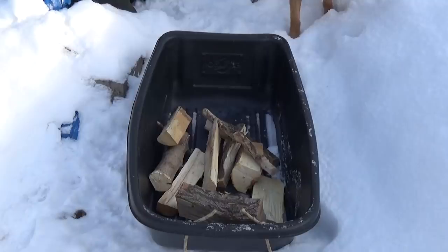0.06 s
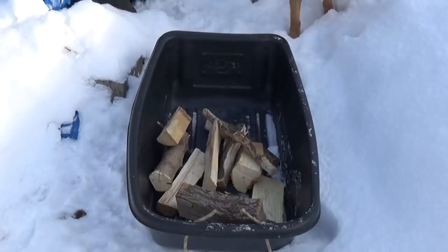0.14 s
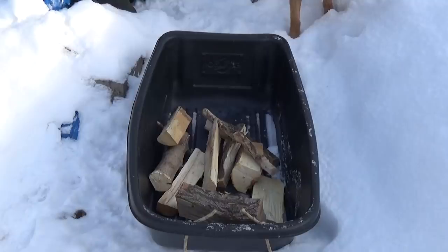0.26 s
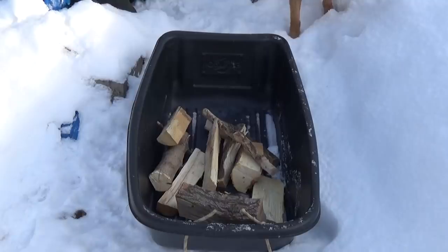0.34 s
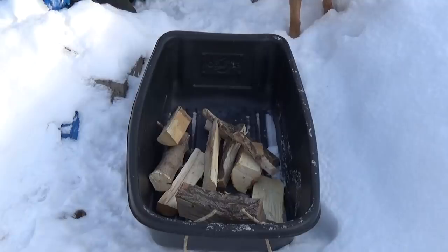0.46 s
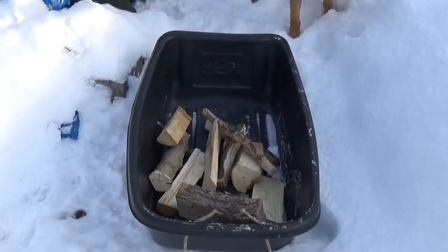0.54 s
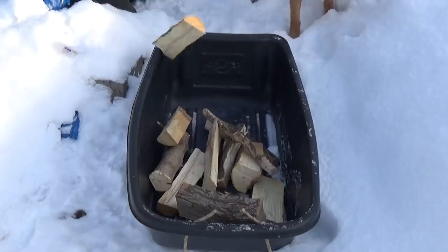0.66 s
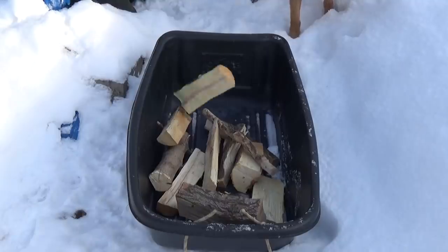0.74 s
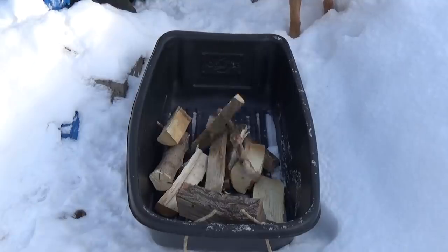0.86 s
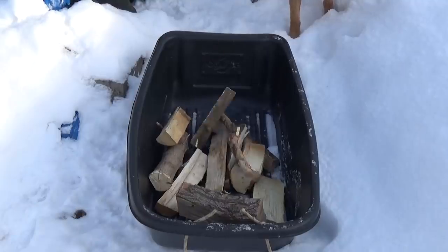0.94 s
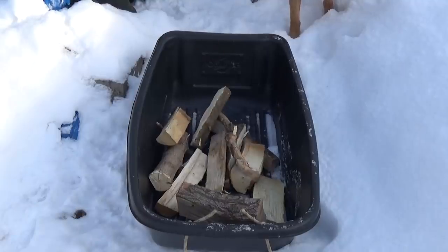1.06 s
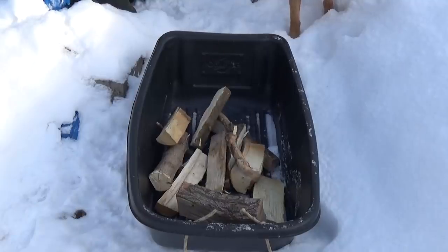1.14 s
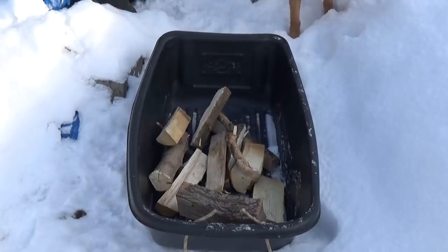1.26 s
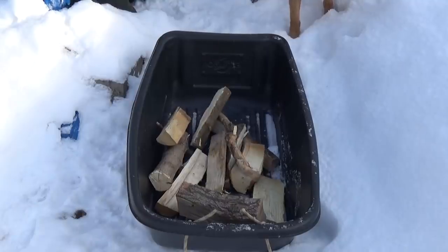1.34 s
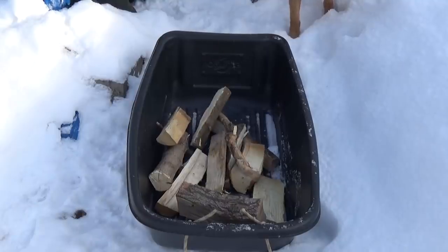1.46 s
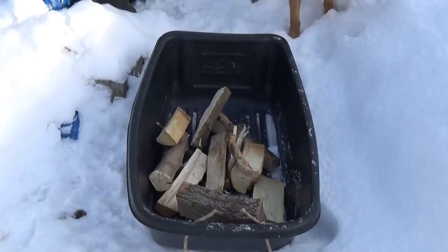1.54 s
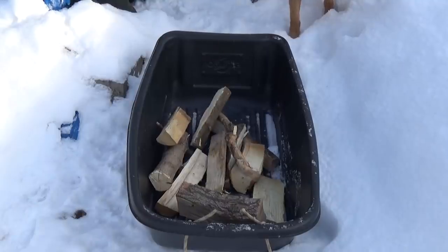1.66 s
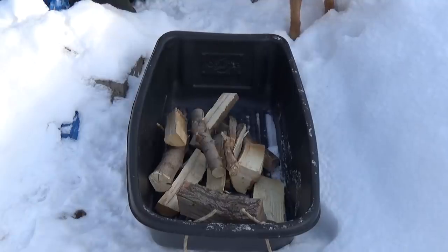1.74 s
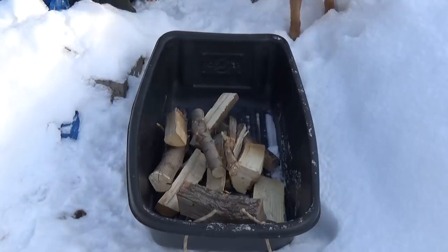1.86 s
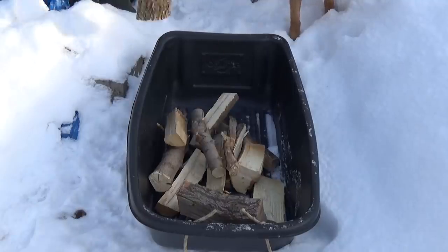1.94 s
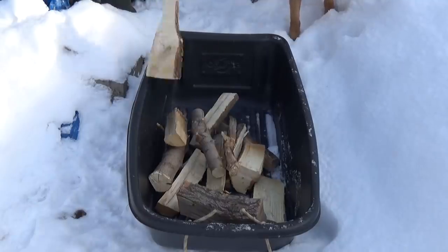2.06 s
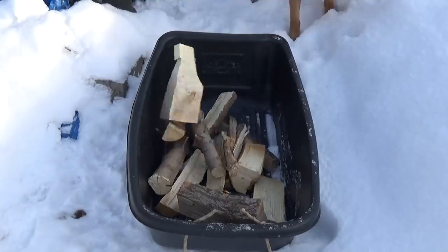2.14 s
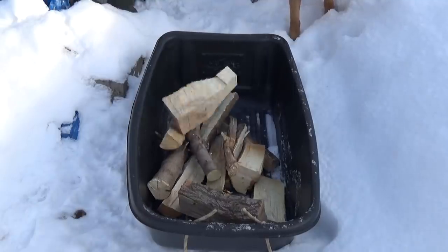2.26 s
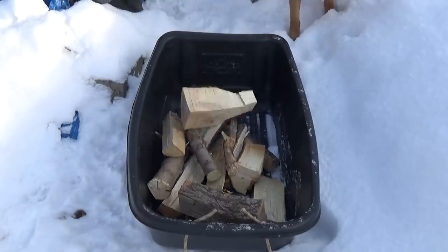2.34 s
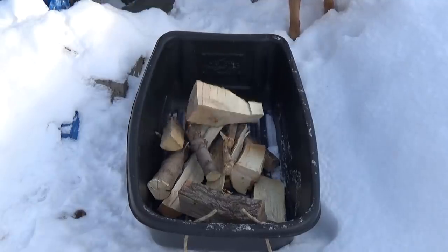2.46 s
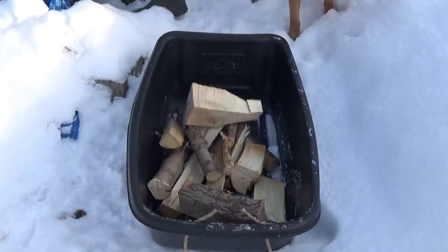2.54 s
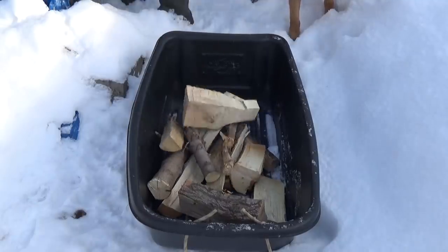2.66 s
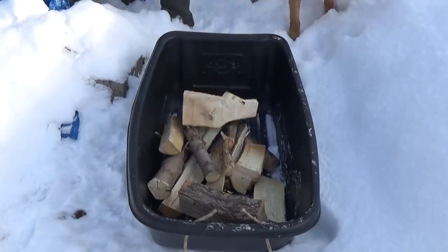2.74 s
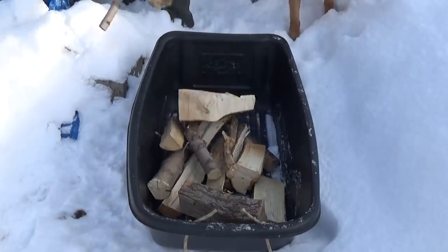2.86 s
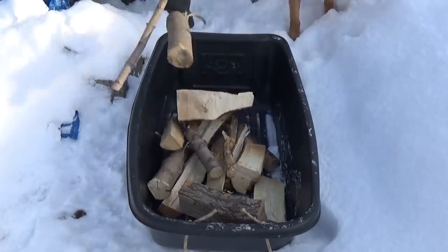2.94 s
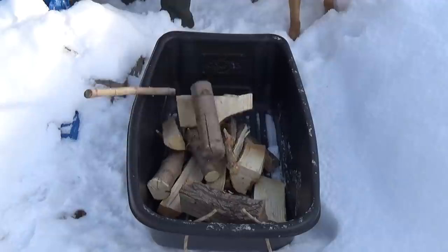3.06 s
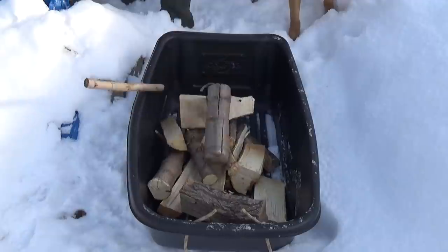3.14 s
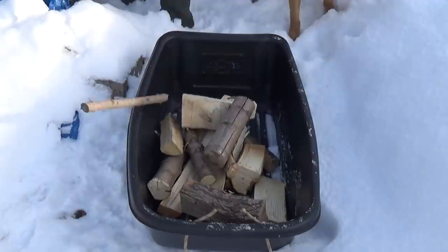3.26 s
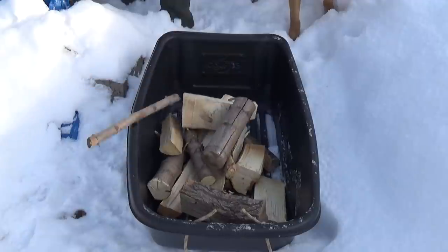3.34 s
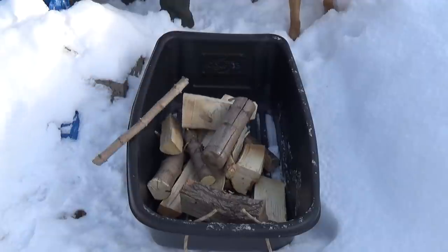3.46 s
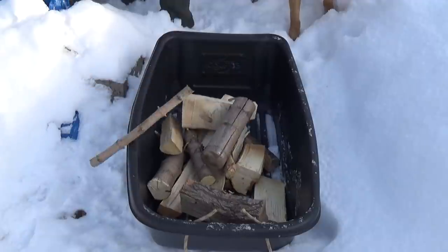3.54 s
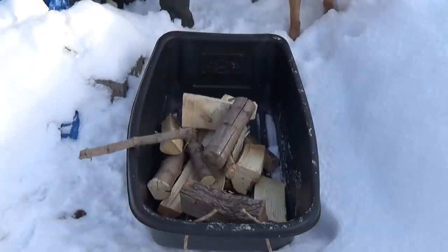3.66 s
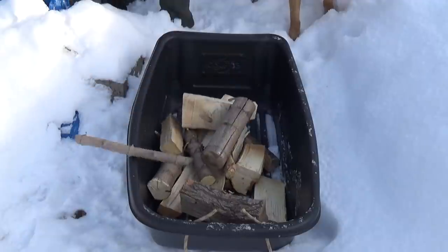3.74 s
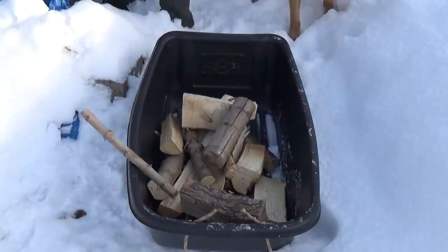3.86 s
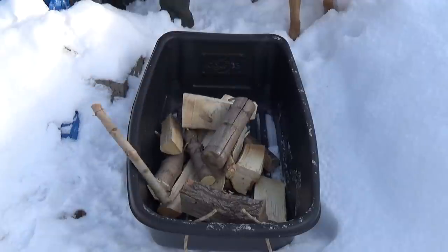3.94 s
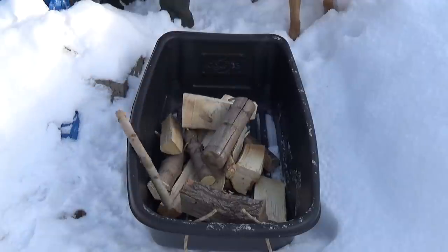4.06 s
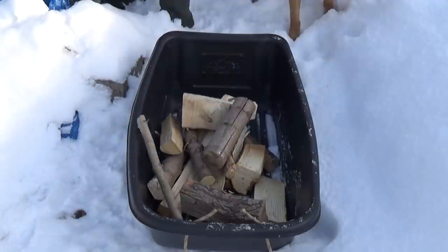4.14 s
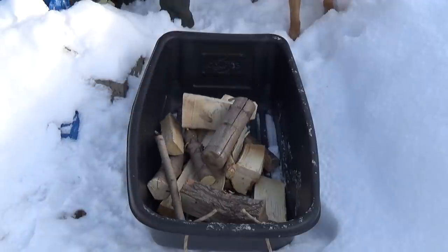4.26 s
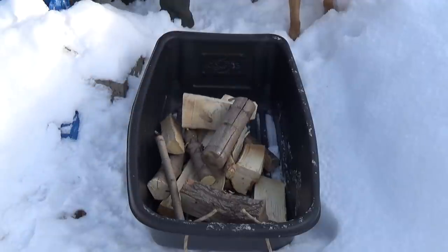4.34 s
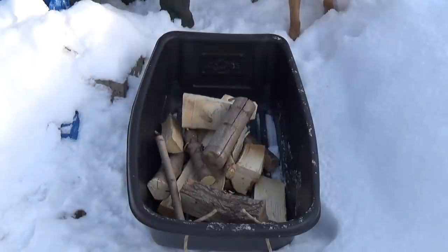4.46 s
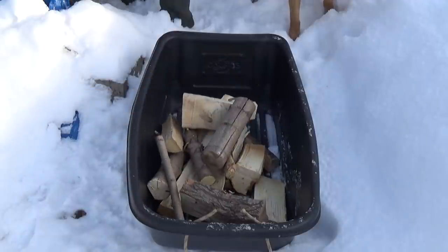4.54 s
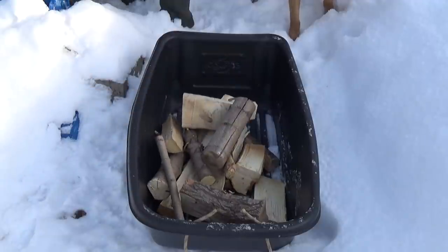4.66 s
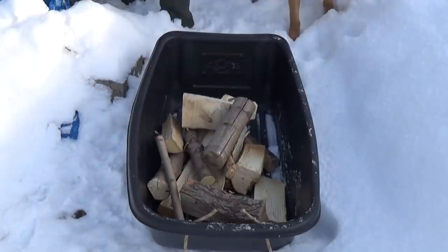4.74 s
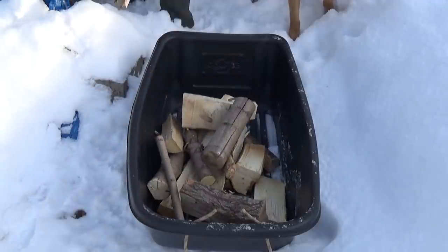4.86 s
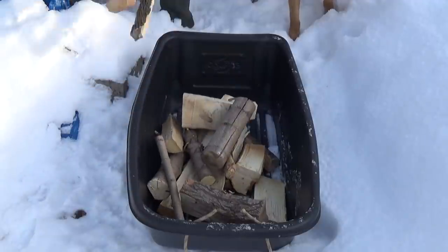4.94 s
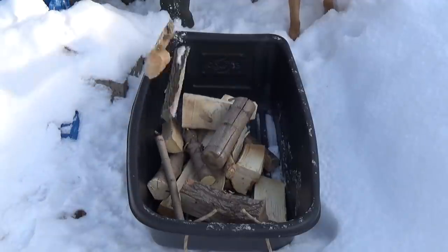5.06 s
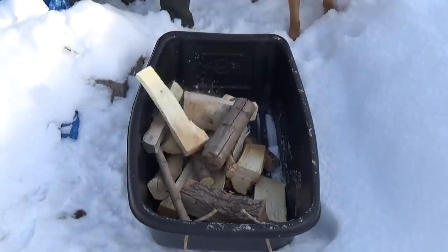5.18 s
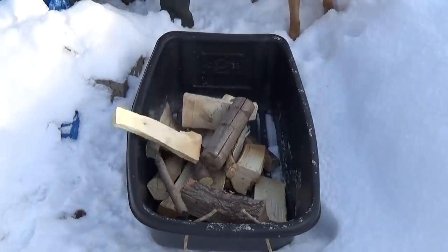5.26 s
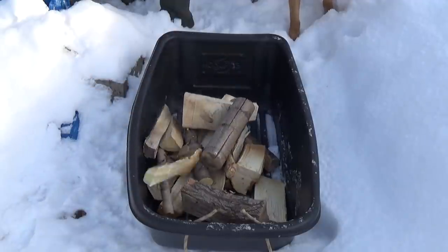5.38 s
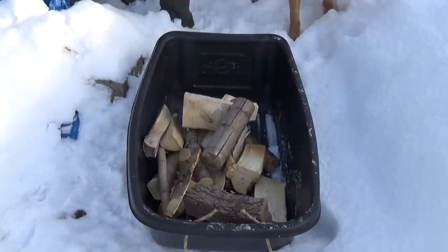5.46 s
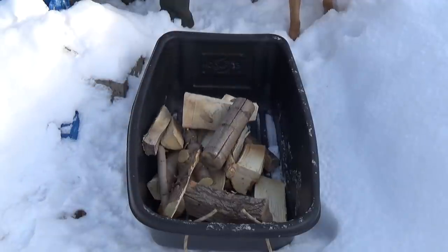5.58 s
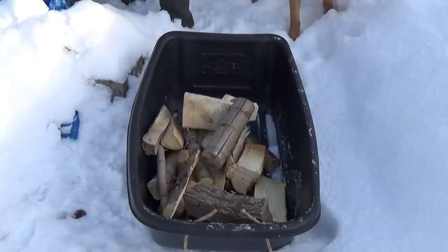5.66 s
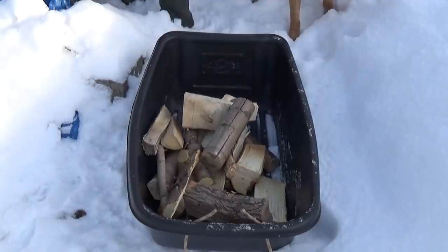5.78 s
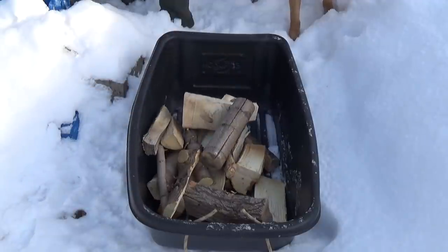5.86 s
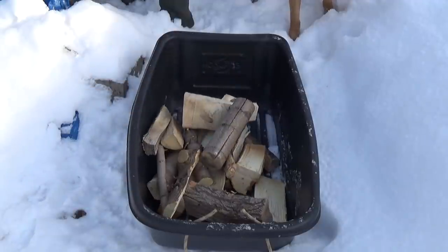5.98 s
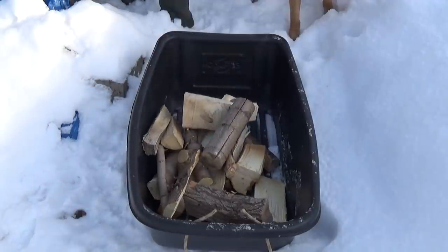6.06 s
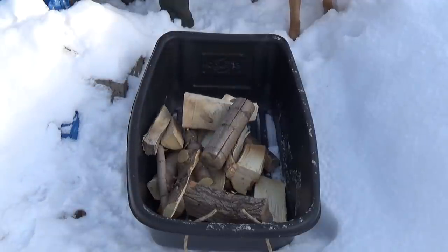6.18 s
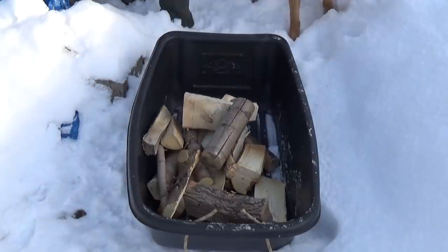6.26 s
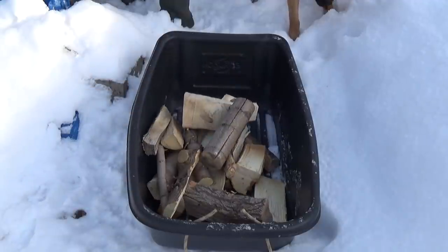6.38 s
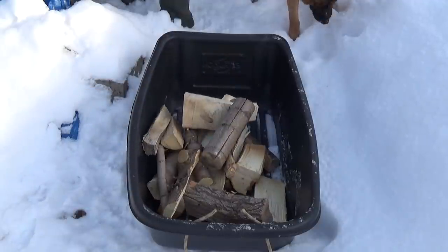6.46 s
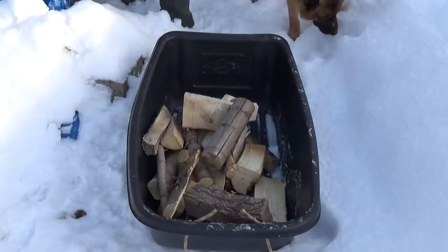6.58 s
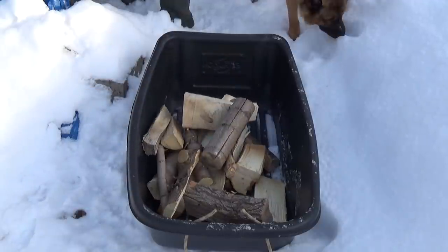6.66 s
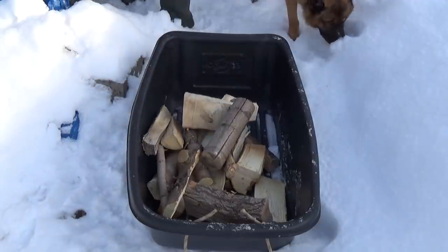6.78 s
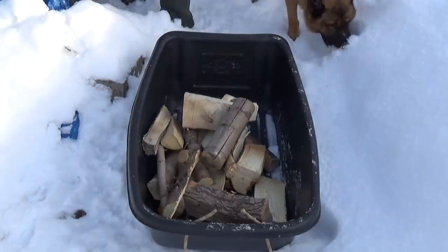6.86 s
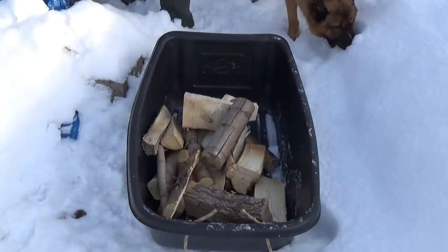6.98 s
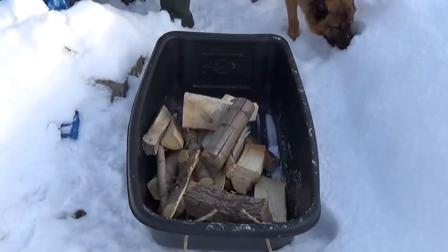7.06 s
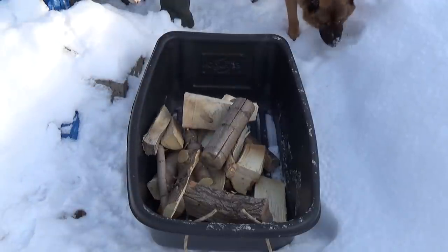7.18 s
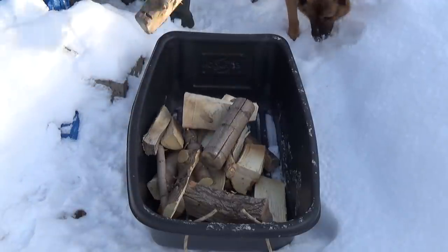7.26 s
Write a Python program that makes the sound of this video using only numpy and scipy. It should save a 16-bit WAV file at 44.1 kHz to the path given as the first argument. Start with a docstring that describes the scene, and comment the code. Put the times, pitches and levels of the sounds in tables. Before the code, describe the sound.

A close stereo microphone, nearly centred, hears split logs hit a hollow plastic tub in uneven bursts separated by quiet. Each landing booms low, with hard wood knocks, short ringing tones and a little rolling clatter. Jacket and boots rustle and snow crunches, strongest at the start. After the last logs, only crackly movement and a few log-on-log knocks remain, without echo.

```python
"""Outdoors on snow, close to a plastic sled: split logs and sticks are thrown in, with no echo added.
Each blow shakes the hull's resonances, so it booms; struck wood rings in damped modes and knocks in noise.
Rolling wood is grainy noise through the hull, with small clacks; bark slides and snaps are noise bursts.
Close to the microphone, jacket and boots rustle and snow crunches in coloured grains; far off, a low rumble."""
import sys
import numpy as np
from scipy import signal
from scipy.fft import rfft, irfft, next_fast_len
from scipy.io import wavfile
from scipy.ndimage import uniform_filter1d, map_coordinates

SR = 44100
rng = np.random.default_rng(int(sys.argv[2]) if len(sys.argv) > 2 else 0)


def to_wav(s):
    """Save 16-bit WAV."""
    ch = np.atleast_2d(s).T  # columns
    pcm = np.round(np.clip(ch, -1, 1) * 32767)  # PCM
    wavfile.write(sys.argv[1], SR, pcm.astype(np.int16))


N = 322812

# the thrower moving, close by: t/s, rustle level/dB
RUSTLE = [(0, -32.5), (.07, -34.5), (.15, -44), (.38, -43), (.5, -51), (.85, -55.5), (1.05, -51.5),
          (1.4, -52), (1.805, -58.5), (1.815, -45), (2.1, -37.5), (2.35, -39.5), (2.55, -46.5), (2.8, -44),
          (3.18, -42), (3.53, -52.5), (3.8, -49.5), (4, -57), (4.45, -48.5), (4.67, -54), (5.17, -51.5),
          (5.66, -49), (6.2, -51.5), (6.28, -55.5), (6.53, -37.5), (6.66, -43.5), (6.8, -50), (7.15, -46.5),
          (7.26, -56.5)]
# blows on the hull: t/s, boom peak level/dB, knock peak level/dB, weight/dB per octave below 300 Hz
THUDS = [(.779, -16, -15.5, -3), (.784, -5.5, -21, -5), (.807, -18, -32, -1), (.89, -20, -16.5, 1.5),
         (.93, -20, -20, 2), (.966, -17, -31, 1.5), (1.088, -31, -36, 9), (1.13, -29.5, -47, -0.5),
         (1.149, -29.5, -37, -0.5), (2.166, -13.5, -19.5, -2.5), (2.187, -16, -24, 3.5),
         (2.224, -13, -14, -4), (2.242, -7.5, -21, -1), (2.262, -13.5, -24, 2.5), (2.327, -20, -38, -1),
         (2.413, -11, -29, 0.5), (2.511, -25, -42, 3.5), (2.654, -32, -41, 5), (2.868, -18.5, -27.5, 0.5),
         (3.082, -15, -7, -7), (3.096, -9, -16, -7.5), (3.133, -10, -10.5, 3), (3.146, -10.5, -17, 4),
         (3.21, -15, -21, -2), (3.225, -17.5, -32.5, -0.5), (3.338, -25, -39, 0), (3.374, -29, -26, -4),
         (3.402, -14.5, -27.5, -7), (3.451, -20, -30, -2), (3.497, -9.5, -14, -7.5),
         (3.504, -14, -29, -9.5), (3.538, -19, -34, -2), (3.84, -27.5, -35, 4), (4.163, -25, -31.5, -0.5),
         (4.178, -20.5, -32, -1.5), (4.315, -10, -16.5, -5), (4.335, -24, -18, 3), (4.566, -28, -39, 5),
         (5.18, -17.5, -21, -1), (5.21, -20, -19, -2), (5.269, -18.5, -28, 6), (5.297, -12, -22, -6.5),
         (5.358, -11.5, -28, 3), (5.384, -11.5, -20, -6), (5.459, -18, -25.5, -1), (5.478, -19, -30, -2),
         (5.533, -27, -24, 7)]
# single snaps: t/s, peak level/dB
SNAPS = [(0.1396, -16.5), (0.2078, -13.5), (.2683, -42), (.308, -42), (.63, -33), (.9962, -19),
         (1.907, -21), (2.0647, -27), (2.1004, -19.5), (2.149, -19), (2.2983, -19), (2.3154, -19.5),
         (2.737, -21.5), (2.8238, -11.5), (2.897, -13.5), (3.3595, -12.5), (3.562, -26), (3.607, -27.5),
         (3.839, -22), (4.0541, -30), (4.0822, -27), (4.1762, -19.5), (4.412, -28), (4.864, -23),
         (5.4963, -26), (5.5943, -24.5), (5.763, -25), (5.8208, -28.5), (5.9733, -22), (6.103, -21.5),
         (6.2493, -21), (6.343, -28), (6.4141, -20.5), (6.4476, -20), (6.538, -21), (6.7244, -25),
         (6.987, -31), (7.022, -26.5)]
# resonances of the plastic hull: f/Hz, width/Hz, level/dB
HULL_MODES = [(72.5, 8.1, -8), (117.4, 22, -4), (186.3, 27.5, -2.5), (236.5, 22.3, -0.5), (292.4, 30.2, -1),
              (377.6, 35, -2.5), (434, 48, -6.5), (543.3, 38, -9), (727, 94, -15.5), (1127, 45, -22.5)]
# treble colour at the microphone, also the rustle's spectrum: f/Hz, relative level/dB
TREBLE = [(1200, -11), (2400, -6.5), (3900, -7), (5400, -5), (6200, -1.5), (7500, -2.5), (9000, -10),
          (10300, -5.5), (11800, -7.5), (12300, -2), (15700, -11)]
# spectrum of the snow underfoot: f/Hz, relative level/dB
CRUNCH = [(88, -41), (150, -45), (420, 5.5), (538, 6), (769, 3.5), (985, 2), (1430, 2), (4000, -9),
          (5200, -13), (8800, -120)]
# spectrum of the far rumble: f/Hz, relative level/dB
RUMBLE = [(12, -51), (20, -13), (102, -17.5), (155, -14), (198, -7.5), (250, -5), (320, -30), (550, -120)]
# stereo balance: f/Hz, left minus right level/dB
LEAN = [(60, 1.2), (700, 1.5), (1290, .5), (2380, 0)]
# unrelated side signal against the near sound: f/Hz, level/dB
APART = [(30, -40), (100, -16), (400, -19), (1300, -27.5), (2400, -36), (4400, -60), (8000, -41),
         (15000, -25)]
# modes of one dry split log: f/Hz, level/dB, t60/s
SPLIT_LOG = [(843, 4.5, 0.15), (1201, -1, 0.14), (1445, 2, .06), (2500, -23.5, 0.12), (3330, -16.5, 0.098),
             (4200, -30, 0.056), (5800, -27, .07), (6500, -20, 0.054), (7420, -25, 0.052),
             (8400, -22, 0.053)]
# its blows: t/s, level/dB added to every mode, share of the first and third modes (0-1; second gets the rest)
SPLIT_BLOWS = [(5.211, -11.5, 0.71), (5.299, -12.5, 0.13), (5.309, -15, 0.5)]
# bark and cloth slides: t/s, level/dB of the grit before its envelope, length/s, dullness/dB per octave
SLIDES = [(0.168, -25.5, 0.048, 2.5), (0.529, -42.5, 0.07, 9.5), (0.778, -33.5, 0.025, -1.5),
          (0.871, -29.5, 0.023, 10.5), (0.899, -35, 0.084, -2), (1.091, -34, 0.009, -3),
          (1.925, -32.5, 0.029, 7.5), (2.166, -30, 0.013, 3), (2.225, -21.5, 0.027, -1),
          (2.419, -26.5, 0.018, 2.5), (2.455, -37, 0.048, 0), (2.854, -30.5, 0.02, -5),
          (3.078, -23.5, 0.0093, 9.5), (3.104, -21, 0.014, 7), (3.126, -25.5, 0.033, 10.5),
          (3.323, -32.5, 0.03, 0), (4.309, -22.5, 0.009, 0.5), (4.326, -42, 0.046, 1),
          (4.871, -44, 0.093, 3), (5.179, -23, 0.0082, 4), (5.197, -29.5, 0.043, 0),
          (5.241, -27, 0.017, -2), (5.266, -37, 0.0084, -2), (5.351, -19, 0.0042, -1),
          (5.365, -28, 0.017, 6.5), (5.459, -33.5, 0.021, -4), (5.53, -33, 0.017, 0.5),
          (6.103, -43, 0.073, 1), (6.485, -32.5, 0.047, 1.5), (6.613, -31.5, 0.0099, -13),
          (6.675, -41, 0.017, 4), (6.74, -42.5, 0.011, -1)]
# how long the wood knock lasts: f/Hz, t60/s
KNOCK_T60 = [(500, 0.19), (1000, 0.087), (2000, 0.052), (4000, 0.011)]
# knocks in the woodpile, away from the hull: t/s, peak level/dB
PILE_KNOCKS = [(.305, -35.5), (0.567, -44), (6.582, -40), (6.611, -19.5), (6.628, -27), (6.691, -15.5),
               (6.703, -24), (6.719, -34), (6.745, -26.5), (6.839, -33.5)]
# loose wood tumbling: peak t/s, peak level/dB, rise/s from 20 dB down, fall/s to 20 dB down
TUMBLES = [(.98, -37.5, .19, 0.14), (2.34, -32, 0.25, 0.26), (3, -45.5, 1, 0.9), (3.4, -40, .3, 0.61),
           (3.74, -41.5, 0.15, 0.43), (3.92, -37, 0.48, 0.084), (4.09, -42.5, 0.11, .3),
           (4.21, -37.5, 0.19, 0.13), (5.36, -26.5, 0.17, 0.26), (6.7, -41, 0.36, 0.35)]
# modes of pieces struck several times, by name of piece: f/Hz, level/dB, t60/s
PIECES = {"short log": [(1203, -0.5, 0.075), (1732, -12, 0.071), (2175, -20.5, 0.11), (3690, -22, 0.048)],
          "long stick": [(647, 1, .1), (1140, -17, .04), (1460, -13, .04), (1665, -19, 0.065)],
          "pile log": [(660, 0, 0.036), (1660, -9, 0.029), (2325, -17, .06)]}
# their blows: t/s, level/dB added to every mode, name of piece
BLOWS = [(.88, -7.5, "short log"), (.893, -14, "short log"), (.931, -14, "short log"),
         (4.336, -15, "long stick"), (4.347, -16.5, "long stick"), (4.36, -13, "long stick"),
         (6.689, -15, "pile log"), (6.746, -22.5, "pile log")]
# single ringing notes of struck wood: t/s, level/dB, f/Hz
NOTES = [(1.088, -39, 1720), (1.904, -34, 2020), (1.931, -28, 1940), (1.934, -27.5, 2550),
         (2.24, -23, 1097), (2.232, -21, 2410), (2.244, -21.5, 2600), (2.258, -21, 1090),
         (2.425, -28, 1094), (2.548, -35, 1320), (2.86, -33.5, 1770), (3.403, -22.5, 943),
         (3.404, -28, 1705), (3.092, -16, 445), (3.5, -12, 426), (5.179, -17.5, 1437), (5.384, -13, 414),
         (5.537, -36, 856), (6.608, -25.5, 880), (6.7, -17, 372), (6.746, -36, 2330), (6.818, -38.5, 1940)]

RUMBLE_DB, BAND_LIMIT_HZ = -81.5, 16828
CRUNCH_DB, CRUNCH_FOLLOWS = -54.5, 0.65  # level at the mean rustle; dB per dB of rustle
FLOOR_DB, FLOOR_FOLLOWS = -62, 0.74  # faint grumble of the hull under the rustle, likewise
# clacks: level against the rolling, median pitch, spread of pitch, cycles to fall 20 dB
RATTLE_DB, RATTLE_HZ, RATTLE_OCTAVES, RATTLE_CYCLES = -13, 890, 0.71, 7
FAINT_OVER_DB = 16.5  # middle of the faint snaps' peaks, over the rustle level
SNAP_DULL_DB, SNAP_VARY_DB, SNAP_RISE_S = -0.5, 2.5, .0001  # dullness per octave, its scatter; rise
PILE_T60_S, NOTE_T60_S = .09, 0.075
CONTACT_S = .0013  # length of the first push on the hull
CHATTER_T60_S, CHATTER_DB, CHATTER_HZ = 0.18, -5.5, 690  # decay, peak against the push, low-pass corner


def amp(db):
    """Decibels to amplitude."""
    return 10 ** (np.asarray(db) / 20)


def unit(x):
    """Scale to rms 1."""
    return x / np.sqrt(np.mean(x ** 2) + 1e-20)


def along(points, hz):
    """Interpolate (f/Hz, value) points on a log frequency axis."""
    f, v = np.transpose(points)
    return np.interp(np.log(hz + 1), np.log(f + 1), v)


def curves(rows):
    """One value per sample for each column after the time."""
    s, *cols = np.transpose(rows)
    return [np.interp(np.arange(N) / SR, s, c) for c in cols]


def add(out, s, sound):
    """Mix a sound in at s seconds."""
    out[round(s * SR):][:len(sound)] += sound


def filtered(x, response):
    """Multiply the spectrum of x by a complex response of frequency."""
    m = next_fast_len(x.shape[-1] + 8192)
    return irfft(rfft(x, m) * response(np.fft.rfftfreq(m, 1 / SR)), m)[..., :x.shape[-1]]


def coloured(x, spectrum):
    """Weight x by an f/Hz, level/dB spectrum, at rms 1."""
    return unit(filtered(x, lambda hz: amp(along(spectrum, hz))))


def wobble(rate):
    """A smooth random curve, rate knots a second."""
    return map_coordinates(rng.standard_normal(int(N * rate / SR) + 4), [np.arange(N) * rate / SR])


def grainy(size, spike_db, share):
    """Noise in which a share of the samples stand out as grains of uneven, bounded size."""
    height = amp(spike_db * np.minimum(rng.exponential(size=size), 3))
    grains = (rng.random(size) < share) * height
    return rng.standard_normal(size) * (1 + grains)


def patchy(x, depth_db):
    """Random gain in patches of time and frequency."""
    z = signal.stft(x, nperseg=256)[2]
    field = uniform_filter1d(rng.standard_normal(z.shape), size=14, axis=0)
    field = uniform_filter1d(field, size=10, axis=1)
    return signal.istft(z * amp(depth_db * unit(field)), nperseg=256)[1][:len(x)]


def bright(burst, dull_db):
    """A burst in the microphone's treble colour, high-passed and tilted dull or bright."""
    def tilt(f):
        level_db = along(TREBLE[1:], f) - dull_db * np.log2((f + 500) / 6000)
        return amp(level_db) * f * f / (f * f + 900 ** 2)
    return filtered(burst, tilt)


def hull(f, spot_db=0, weight_db=0):
    """The plastic tub's resonances, some favoured by the spot struck; it radiates little deep bass."""
    octaves_below = np.log2(300 / np.array(HULL_MODES)[:, 0])  # a heavy log drives the low modes
    gains = amp(spot_db * rng.standard_normal(len(HULL_MODES)) + weight_db * octaves_below)
    modes = 0
    for k, (centre, width, db) in enumerate(HULL_MODES):
        resonance = 1j * f * width / (centre * centre - f * f + 1j * f * width)
        modes = modes + (-1) ** k * gains[k] * amp(db) * resonance
    return modes * (1j * f / (65 + 1j * f)) ** 4


def movement():
    """Cloth and snow rustle in grains; loose wood grumbles on the hull and rattles; air rumbles far off."""
    rustle_db, = curves(RUSTLE)
    stir_db, t = rustle_db - rustle_db.mean(), np.arange(N) / SR
    flutter = wobble(25)  # shared by cloth and snow

    cloth = coloured(patchy(grainy(N, 5.5, .006), depth_db=2), TREBLE)
    rustle = amp(rustle_db + 1.32 * flutter + 1.06 * wobble(90)) * cloth

    snow = coloured(patchy(grainy(N, 5.5, .004), depth_db=2.5), CRUNCH)
    crunch_db = CRUNCH_DB + CRUNCH_FOLLOWS * stir_db
    crunch = amp(crunch_db + 1.55 * flutter + 1.7 * wobble(40)) * snow

    # the loudest tumble, or else the faint floor under the rustle, sets the level
    tumbling = [db - 20 * np.maximum((s - t) / rise, (t - s) / fall) for s, db, rise, fall in TUMBLES]
    roll_db = np.max(tumbling + [FLOOR_DB + FLOOR_FOLLOWS * stir_db], axis=0)
    grumble = unit(filtered(grainy(N, 3.7, 0.0022), hull))
    roll = amp(roll_db + 2.6 * wobble(18)) * (grumble + amp(RATTLE_DB) * rattle(count=1500))

    rumble = amp(RUMBLE_DB + 3.4 * wobble(5.5)) * coloured(rng.standard_normal(N), RUMBLE)
    return rustle + crunch + roll + rumble


def rattle(count):
    """Many small clacks of wood on wood, each a short damped note, at rms 1."""
    when, size = rng.random((count, 2)).T
    hz = RATTLE_HZ * 2 ** (RATTLE_OCTAVES * rng.standard_normal((count, 1)))
    t = np.arange(SR // 40) / SR
    level_db = -5 * np.log(size[:, None] + .02) - 60 * t * hz / (3 * RATTLE_CYCLES)
    notes = amp(level_db) * np.sin(2 * np.pi * hz * t)
    at = (when * N).astype(int)[:, None] + np.arange(len(t))
    return unit(np.bincount(at.ravel(), notes.ravel(), N + SR)[:N])


def snaps():
    """Each snap is a tick and a longer, weaker puff of noise with a sharp rise."""
    out, t = np.zeros(N + SR), np.arange(SR // 5) / SR
    decay = amp(-60 * t / .006) + 0.25 * amp(-60 * t / 0.041)  # tick and puff
    envelope = decay * (1 - np.exp(-t / SNAP_RISE_S))
    for s, db in SNAPS + faint(count=90):
        dull_db = rng.normal(SNAP_DULL_DB, SNAP_VARY_DB)
        burst = bright(rng.standard_normal(len(t)) * envelope, dull_db)
        burst = patchy(burst, depth_db=2.5)  # each snap favours its own bands
        add(out, s, amp(db) * burst / np.abs(burst).max())
    return out[:N]


def faint(count):
    """Faint snaps at random times, their peaks set over the rustle level."""
    when, size = rng.random((count, 2)).T
    s = when * N / SR
    return list(zip(s, np.interp(s, *np.transpose(RUSTLE)) + FAINT_OVER_DB + 6 * (size - .5)))


def slides():
    """Bark and cloth scrape in grains: short slides start with an accent, long ones swell, then all fade."""
    out, t = np.zeros(N + SR), np.arange(SR // 5) / SR
    for s, db, length, dull_db in SLIDES:
        grit = unit(patchy(bright(grainy(len(t), 5, .012), dull_db), depth_db=3.5))
        rise = 1 - np.exp(-t / (0.00036 + 0.065 * length))
        accent = 1 + 0.94 * np.exp(-t / 0.0021)
        fade = np.exp(-np.maximum(t - 0.81 * length, 0) / (0.0029 + 0.15 * length))
        add(out, s, amp(db) * rise * accent * fade * grit)
    return out[:N]


def pile():
    """Short hollow knocks of log on log: decaying noise through a double resonance at 480 Hz."""
    out, t = np.zeros(N + SR), np.arange(SR // 4) / SR

    def hollow(f):
        return (1j * f * 400 / (480 ** 2 - f * f + 1j * f * 400)) ** 2 * (1 + 1j * f / 900)

    for s, db in PILE_KNOCKS:
        force = rng.standard_normal(len(t)) * amp(-60 * t / PILE_T60_S) * (1 - np.exp(-t / 0.00096))
        knock = filtered(force, hollow)
        add(out, s, amp(db) * knock / np.abs(knock).max())
    return out[:N]


def thuds():
    """One push and a dying chatter shake the hull; the wood knocks, its high tones dying first."""
    out, t = np.zeros(N + SR), np.arange(SR // 3) / SR
    push = np.sin(np.pi * np.minimum(t / CONTACT_S, 1))  # half a sine
    for s, db, knock_db, weight_db in THUDS:
        chatter = rng.standard_normal(len(t)) * amp(-60 * t / CHATTER_T60_S) * (1 - np.exp(-t / 0.00039))
        chatter = filtered(chatter, lambda f: 1 / (1 + 1j * f / CHATTER_HZ))
        force = amp(CHATTER_DB) * chatter / np.abs(chatter).max() + push
        boom = filtered(force, lambda f: hull(f, spot_db=3.0, weight_db=weight_db))
        knock = wood_knock(t)
        add(out, s, amp(db) * boom / np.abs(boom).max() + amp(knock_db) * knock / np.abs(knock).max())
    return out[:N]


def wood_knock(t):
    """Noise above 400 Hz whose bands decay at their own rates, through random wood resonances."""
    hz, u, z = signal.stft(rng.standard_normal(len(t)), SR, nperseg=128)
    level_db = -7 * np.log2(hz / 700 + 0.12) - 60 * u[:, None] / along(KNOCK_T60, hz)
    shaped = z * amp(level_db.T) * (hz > 400)[:, None]
    knock = signal.istft(shaped, SR, nperseg=128)[1][:len(t)] * (1 - np.exp(-t / 0.001))
    return filtered(knock, woody)


def woody(f):
    """A random cluster of short wood resonances over a plain response."""
    centres, gains = 500 * 8 ** rng.random(9), rng.standard_normal(9)
    response = 0.64
    for c, g in zip(centres, gains):
        response = response + 0.99 * g * 1j * f * 0.07 * c / (c * c - f * f + 1j * f * 0.065 * c)
    return response


def rings():
    """Struck pieces sing their damped modes at every blow; the dry split log sings a whole series."""
    out = np.zeros(N + SR)
    for s, db, piece in BLOWS:
        # each mode's pitch varies a little from blow to blow
        modes = [(hz * rng.normal(1, .012), db + level, t60) for hz, level, t60 in PIECES[piece]]
        add(out, s, ringing(modes))
    for s, db, outer in SPLIT_BLOWS:
        # the spot struck picks among the three low modes
        share = [outer, 1 - outer, outer] + [1] * (len(SPLIT_LOG) - 3)
        modes = [(hz, db + level + 20 * np.log10(abs(k) + 1e-3), t60)
                 for (hz, level, t60), k in zip(SPLIT_LOG, share)]
        add(out, s, ringing(modes))
    for s, db, hz in NOTES:
        add(out, s, ringing([(hz, db, NOTE_T60_S)]))
    return out[:N]


def ringing(modes):
    """Damped modes (f/Hz, level/dB, t60/s); their phases drift at random."""
    t = np.arange(SR // 4) / SR
    drift = np.cumsum(rng.standard_normal((len(modes), len(t))), axis=1) * .032  # radians
    ring = sum(amp(db - 60 * t / t60) * np.sin(2 * np.pi * hz * t + d)
               for (hz, db, t60), d in zip(modes, drift))
    return ring * (1 - np.exp(-t / 0.00091)) ** 2


def scene():
    """Both microphone ports hear nearly the same; the bass leans left, a phase-scattered side adds width."""
    near = movement() + snaps() + slides() + pile() + thuds() + rings()
    z = signal.stft(near, nperseg=512)[2]
    random_phase = np.exp(2j * np.pi * rng.random(z.shape))
    scattered = signal.istft(z * random_phase, nperseg=512)[1][:N]
    side = filtered(scattered, lambda hz: amp(along(APART, hz)))
    pair = filtered(np.array([near, near]), lambda hz: amp(np.outer([.5, -.5], along(LEAN, hz))))
    return pair + [side, -side]


def record(dry):
    """Peaks are softly squeezed; the treble fades at the top and nothing passes the band limit."""
    squeezed = dry / (1 + np.abs(dry / .7) ** 4) ** (1 / 4)
    top = [(15750, 0.5), (16000, -31)]  # f/Hz, level/dB
    return filtered(squeezed, lambda hz: (hz < BAND_LIMIT_HZ) * amp(along(top, hz)))


dry = scene()
out = record(dry)
to_wav(out)
```